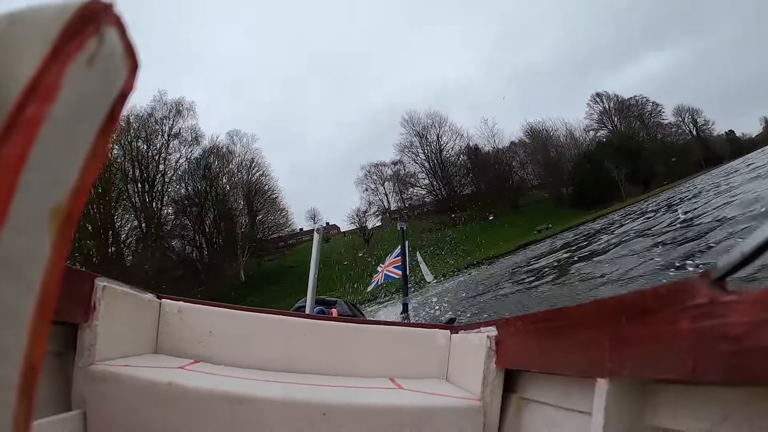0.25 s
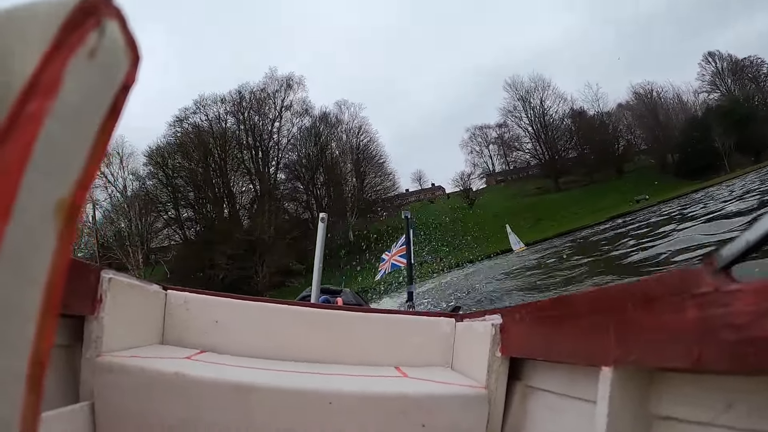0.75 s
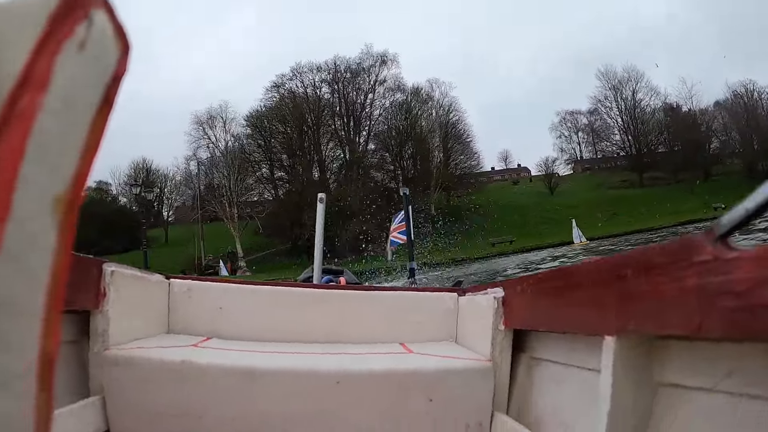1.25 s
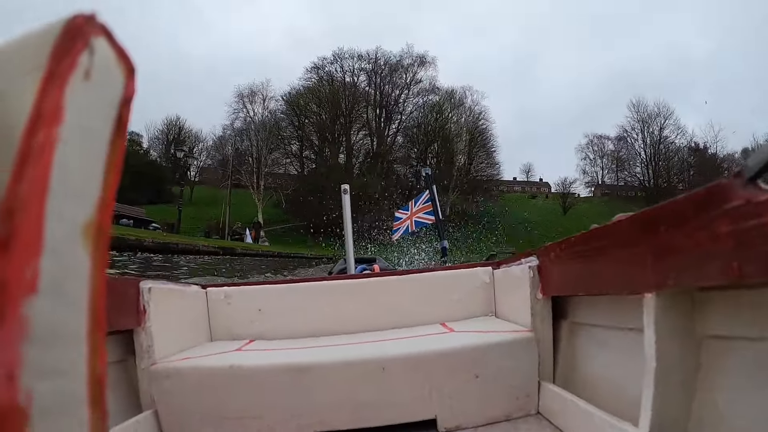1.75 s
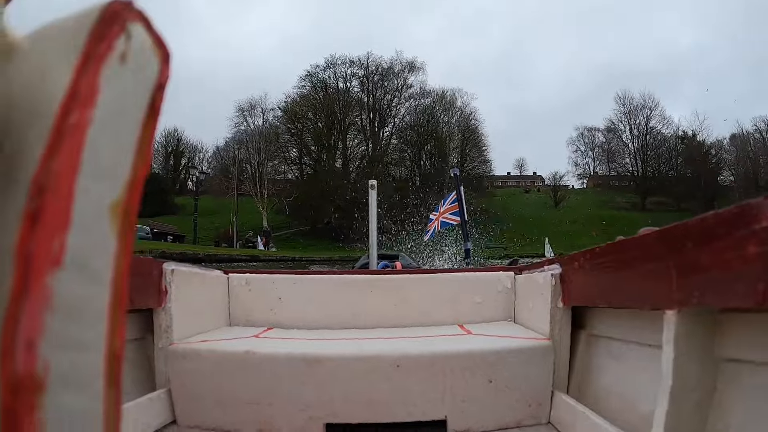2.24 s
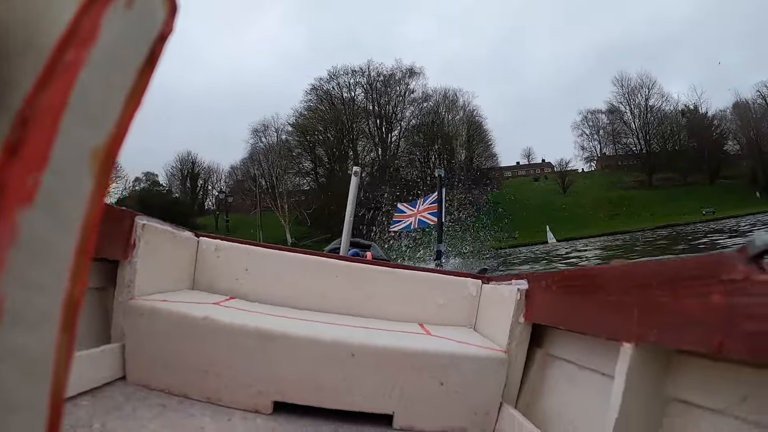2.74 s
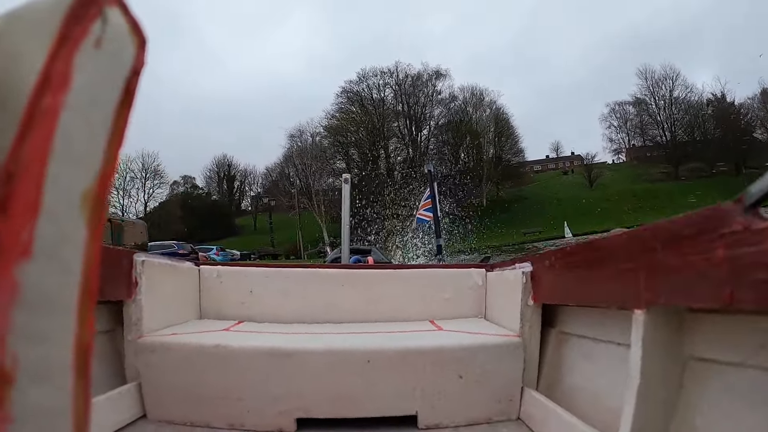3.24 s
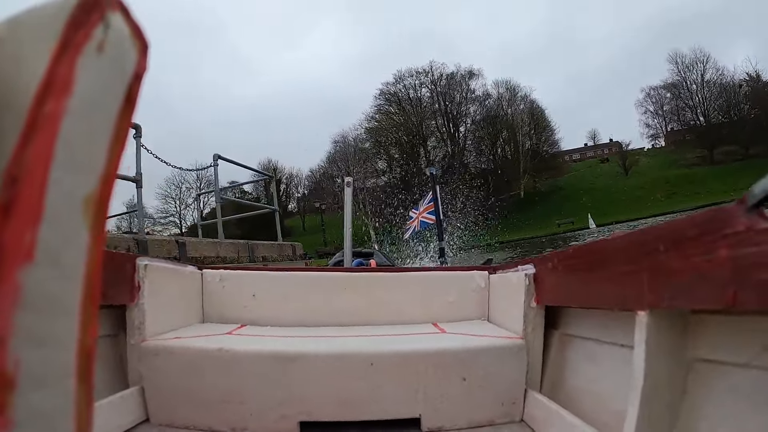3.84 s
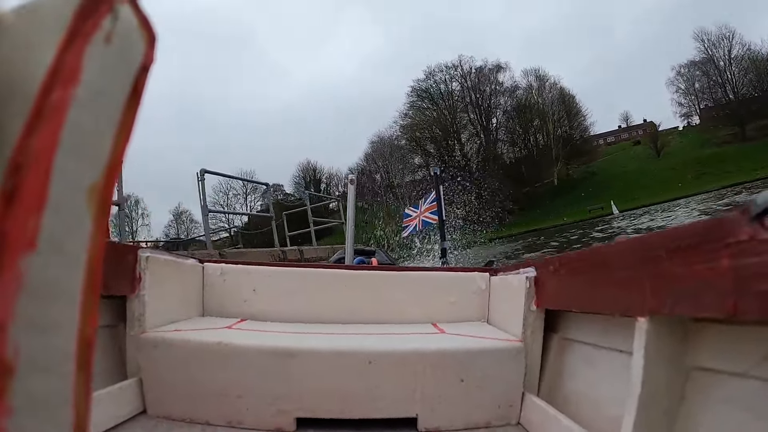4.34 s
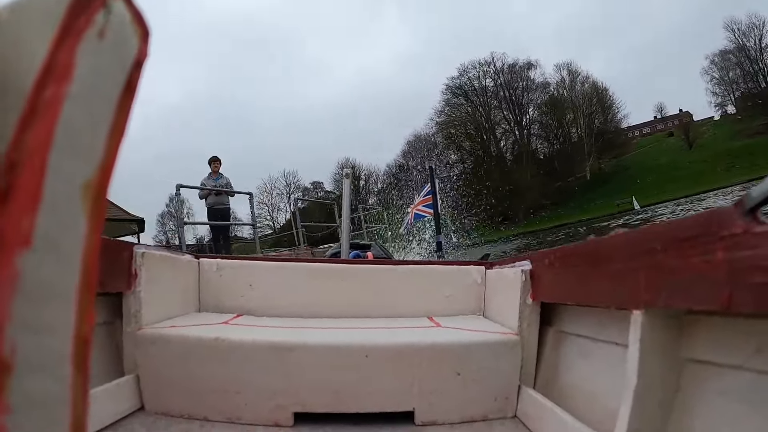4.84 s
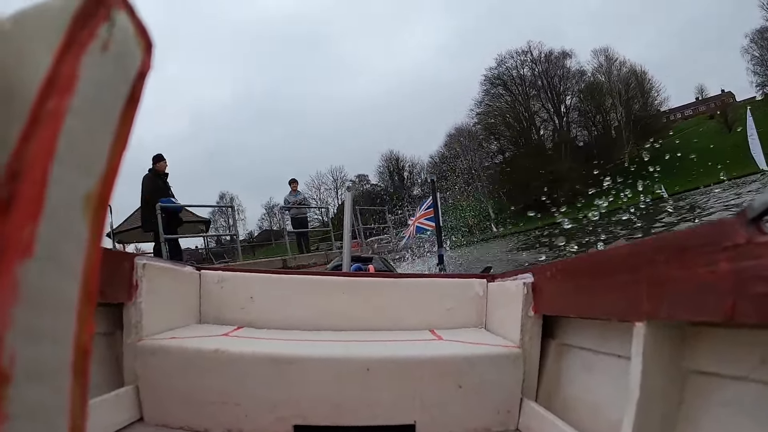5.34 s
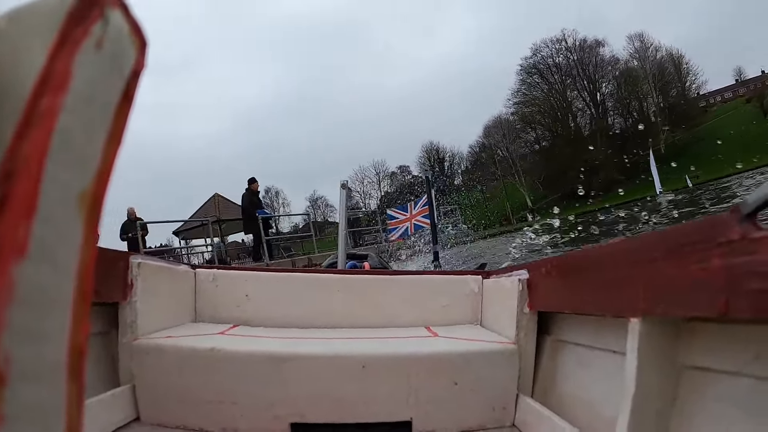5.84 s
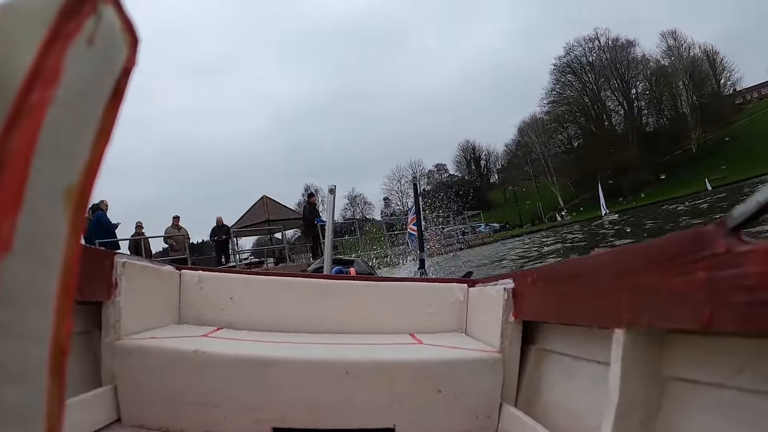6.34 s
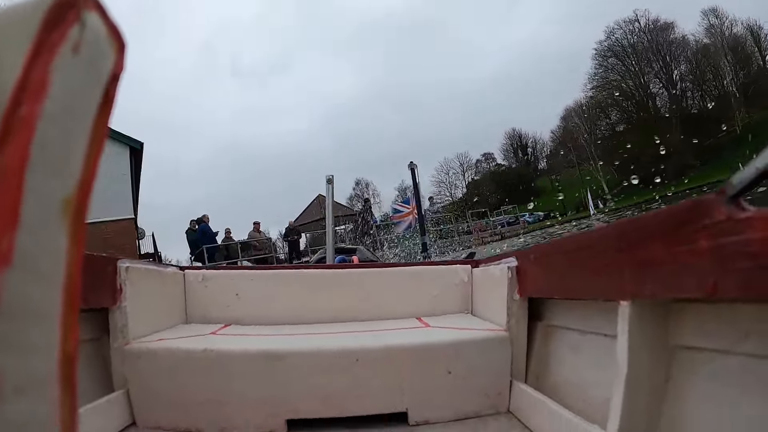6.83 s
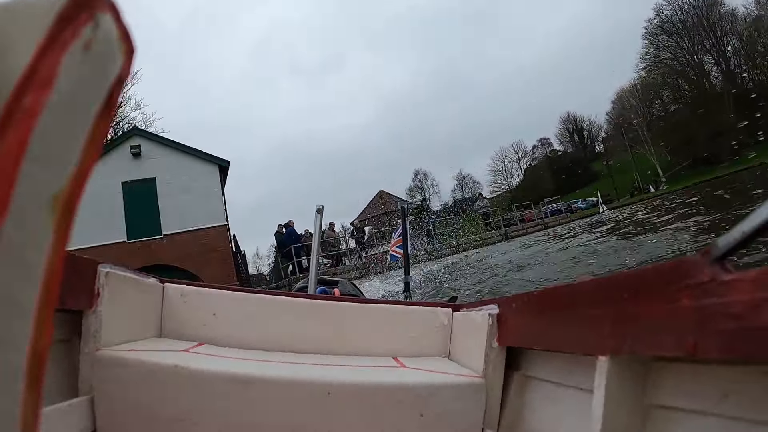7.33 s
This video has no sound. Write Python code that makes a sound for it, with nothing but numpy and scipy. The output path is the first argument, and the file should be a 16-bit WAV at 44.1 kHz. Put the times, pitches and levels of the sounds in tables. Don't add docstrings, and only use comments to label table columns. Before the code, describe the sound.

A buzzing motor drone holds nearly constant pitch while water rushes along thin planks and waves knock the hull, most heavily near the end.

```python
import sys
import numpy as np
from scipy import signal
from scipy.fft import rfft, irfft
from scipy.io import wavfile
from scipy.ndimage import uniform_filter1d

SR = 44100
rng = np.random.default_rng(int(sys.argv[2]) if len(sys.argv) > 2 else 0)


def bounce(signal):
    frames = np.transpose(np.atleast_2d(signal))
    limited = np.clip(frames, -1, 1)
    pcm = np.round(limited * 32767).astype(np.int16)
    wavfile.write(sys.argv[1], SR, pcm)


def ratio(d):
    e = np.asarray(d, float) / 20
    return 10 ** e


N = 334278

# (time [s], change [dB], spread [s])
FLOW_SURGES = [(0.289,-7,0.015), (0.409,-4.5,0.013), (0.609,-6.5,0.011), (0.9,2,.04), (1.262,-3.5,0.011),
               (1.58,1,0.011), (2.2,2.5,0.064), (2.38,1.5,0.01), (2.549,2.5,0.059), (2.689,1.5,0.047),
               (2.844,3.5,0.024), (3.0,1.5,.04), (3.4,2.5,.04), (3.49,-3,0.022), (3.647,3,0.01),
               (4.42,2,0.078), (4.615,-5,0.0051), (4.859,-3.5,0.029), (4.92,1.5,0.02), (5.293,-5.5,0.0084),
               (5.38,1.5,0.023), (5.512,-3.5,0.019), (5.617,-5.5,0.0063), (5.85,6,0.0053),
               (6.665,4.5,0.017), (6.74,-6.5,0.018), (6.815,-2.5,0.02), (6.914,-7.5,0.017),
               (6.969,-7.5,0.015), (7.35,2.5,0.033)]


def in_time(rows):
    s, *columns = np.transpose(rows)
    return [np.interp(np.arange(N) / SR, s, c) for c in columns]


def bumps(rows):
    out, t = np.zeros(N), np.arange(N) / SR
    for s, change, spread in rows:
        near = slice(max(int((s - 4 * spread) * SR), 0), int((s + 4 * spread) * SR))
        out[near] += change * np.exp(-0.5 * ((t[near] - s) / spread) ** 2)
    return out


def rms_one(x):
    return x / np.sqrt(np.mean(x ** 2) + 1e-20)


def drift(rate):
    r = np.exp(-40 * np.pi * rate / SR)
    coarse = rng.standard_normal(N // 20 + 4002)
    slow = signal.lfilter([1], [1, -2 * r, r * r], coarse)[4000:]
    return np.interp(np.arange(N) / 20, np.arange(len(slow)), rms_one(slow))


def band(x, low_hz, high_hz):
    return signal.sosfilt(signal.butter(3, [low_hz, high_hz], "band", fs=SR, output="sos"), x)


def ring(clicks, hz, cycles):
    r, w = ratio(-60 * hz / (cycles * SR)), 2 * np.pi * hz / SR
    return signal.lfilter([0, np.sin(w)], [1, -2 * r * np.cos(w), r * r], clicks + 1e-18)


def hull(x):
    # (frequency [Hz], level [dB per Hz])
    below_cavity = [(12, -42), (25, -17.5), (60, -19.5), (180, -19.5), (245, -10), (330, -14.5), (420, -10),
                    (560, -13), (650, -22), (770, -24), (1100, -18), (1320, -21.5), (1500, -16.5),
                    (2110, -20)]
    # (frequency [Hz], level [dB per Hz])
    above_cavity = [(2260, -0.5), (3100, 0), (3700, -4.5), (4800, -7.5), (5800, -13.5), (6400, -13.5),
                    (7800, -16), (8500, -21.5), (10400, -26), (11500, -35.5), (12400, -29.5), (14000, -38),
                    (15500, -46), (17000, -58.5)]
    # (frequency [Hz], width [Hz], boost [dB])
    planks = [(266.3, 53, 8), (400, 55, 6.5), (865, 61, 5), (1680, 81, 7.5), (1937, 150, 2.5),
              (4260, 100, -6), (4360, 166, 11)]
    housing_db = -33.5
    size = 16384
    hz = np.maximum(np.arange(size // 2 + 1) * SR / size, 1)
    points = np.array(below_cavity + [(f, db + housing_db) for f, db in above_cavity])
    level_db = np.interp(np.log(hz), np.log(points[:, 0]), points[:, 1])
    for f, width, boost_db in planks:
        level_db = level_db + boost_db / (1 + (2 * (hz - f) / width) ** 2)
    cepstrum = irfft(np.log(ratio(level_db)), size)
    cepstrum[1:size // 2] *= 2
    cepstrum[size // 2 + 1:] = 0
    return signal.fftconvolve(x, irfft(np.exp(rfft(cepstrum)), size))[..., :N]


def blade_db():
    # (time [s], level [dB])
    load = [(0.0, -20), (0.4, -17), (0.75, -12.5), (1.0, -18), (1.28, -10.5), (1.38, -26.0), (1.8, -34),
            (2.05, -19), (2.2, -28.5), (2.38, -16.5), (2.8, -11), (3.0, -18.5), (3.5, -14.5), (4.0, -19.5),
            (5.0, -14), (6.0, -15), (7.1, -17), (7.58, -13.5)]
    # (time [s], change [dB], spread [s])
    slips = [(0.344, -8, 0.02), (0.808, -15.5, 0.027), (0.863, -17.5, 0.018), (1.901, -6, 0.033),
             (2.145, -12, 0.016), (2.27, -8.5, 0.014), (2.514, -8.5, 0.01), (2.594, -11, 0.011),
             (2.699, -5.2, 0.018), (2.893, -14.5, 0.036), (3.352, -10.5, 0.04), (3.707, -3.5, 0.019),
             (4.495, -10, 0.049), (4.939, -13.5, 0.0099), (4.969, -6.7, 0.054), (5.024, -14, 0.012),
             (5.208, -7, 0.013), (5.373, -19, 0.034), (5.507, -4.5, 0.018), (5.607, -18, 0.014),
             (5.702, -8, 0.02), (5.822, -12.5, 0.025), (5.872, -7.5, 0.011), (6.081, -7.5, 0.036),
             (6.286, -6.5, 0.011), (6.44, -7, 0.016), (6.575, -6.5, 0.0097), (6.645, -6.5, 0.06),
             (7.094, -8, 0.03), (7.353, -6, 0.041)]
    # (time [s], change [dB], spread [s])
    bites = [(0.244,7,0.014), (0.56,2,0.04), (1.21,2,0.022), (1.626,13.5,0.04), (2.04,3.5,0.028),
             (2.47,1.5,0.016), (3.113,2.5,0.016), (3.198,6,0.012), (3.487,6.5,0.011), (3.881,7,0.015),
             (4.051,5.5,0.023), (4.255,5.5,0.013), (4.33,6,0.066), (4.56,5.5,0.022), (4.724,4,0.025),
             (4.8,3,0.025), (5.15,3.5,0.022), (5.245,8,0.0062), (5.57,4.5,.015), (5.76,3,.015),
             (5.961,4.5,0.043), (6.2,1.5,0.025), (6.505,2.5,0.034), (6.718,7,0.0065), (6.795,4,0.032),
             (6.95,4.5,.015), (7.2,0,0.016), (7.3,1.5,.015), (7.44,3,0.02)]
    return in_time(load)[0] + bumps(slips) + bumps(bites)


def spray_droplets(spray_db):
    sizes = ratio(4.5 * np.minimum(rng.exponential(1, N), 4.1))
    sizes = sizes * (rng.random(N) < 450 * ratio(spray_db) / SR)
    pitches, dealt = np.geomspace(2300, 13000, 16), rng.integers(0, 16, N)
    return sum(ring(sizes * (dealt == k), hz, cycles=95.0) * np.sqrt(hz) for k, hz in enumerate(pitches))


def water():
    # (time [s], lift [dB], spread [s])
    heaves = [(0.264,11,0.016), (0.389,10,0.018), (0.559,9,0.035), (0.908,10.5,0.024), (1.137,4,0.016),
              (2.12,1,0.023), (2.74,9,0.061), (3.15,5.5,0.026), (3.357,7.5,0.039), (3.62,3.5,0.044),
              (4.565,6.5,0.027), (5.852,7.5,0.02), (6.006,7,0.018), (6.371,3,0.067), (6.705,19,0.018),
              (6.944,15.5,0.022), (7.17,17.5,0.019), (7.473,12.5,0.055)]
    duck_per_db, duck_lag_s = 0.0143, 0.048
    beat_db, t = uniform_filter1d(blade_db(), size=1100), np.arange(N) / SR
    rush_db = bumps(FLOW_SURGES) - duck_per_db * np.interp(t - duck_lag_s, t, beat_db - beat_db.mean())
    spray_db = 1.04 * rush_db
    heave_db = bumps(heaves) - 2.2 + 1.6 * drift(5.4)
    gurgle_db = 0.46 * bumps(heaves) + 0.35 * rush_db - 2.5 + 0.8 * drift(8.8)
    lap_db = 0.47 * rush_db - 3.0 + 0.8 * drift(9.9)
    regions = [(140, heave_db), (280, gurgle_db), (600, lap_db), (2100, rush_db), (6000, spray_db),
               (np.inf, 0.7 * spray_db)]

    white, surge = rng.standard_normal((2, N)), drift(29)
    edges, flow = 16 * 2 ** np.arange(0, 10.1, 0.5), np.zeros(N)
    for k, (low, high) in enumerate(zip(edges, edges[1:])):
        flow_db = next(db for limit, db in regions if high < limit)
        half_octave = signal.butter(2, [low, high], "band", fs=SR, output="sos")
        patch = signal.sosfilt(half_octave, white[k % 2])
        flow += patch * ratio(flow_db + 1.02 * surge + 1.87 * drift(18.2))
    droplets = spray_droplets(spray_db)
    return ratio(-20) * rms_one(hull(rms_one(flow) + 0.27 * rms_one(droplets)))


def laps():
    per_s, level_db = 22, -35
    sizes = ratio(4.8 * np.minimum(rng.exponential(1, N), 3.1)) * (rng.random(N) < per_s / SR)
    pitches, dealt = np.geomspace(330, 720, 8), rng.integers(0, 8, N)
    knocks = sum(ring(sizes * (dealt == k), hz, cycles=14) for k, hz in enumerate(pitches))
    return ratio(level_db) * rms_one(band(knocks, 250, 900))


def drops():
    # (time [s], peak [dB], ring [Hz])
    landings = [(0.2515, -17.5, 2670), (0.6564, -19.5, 2370), (1.113, -18, 2440), (1.1962, -26, 2840),
                (1.7095, -25.5, 2380), (2.0832, -16, 3500), (2.37, -19, 3650), (2.6748, -23.5, 2920),
                (3.6426, -25, 2740), (4.0664, -22, 2420), (4.2243, -18.5, 2780), (4.5246, -20, 2910),
                (4.7055, -19.5, 2550), (5.263, -39, 2850), (5.668, -20.5, 3050), (5.847, -25, 2830),
                (6.1005, -23, 2816), (6.173, -19.5, 2440), (6.335, -19, 2630), (6.4363, -29, 2560),
                (6.6425, -14.5, 2680), (6.8643, -22, 2470), (6.9316, -21, 2500), (7.01, -22, 2620),
                (7.2418, -19, 2600), (7.4927, -17, 2450)]
    out, t = np.zeros(N + SR), np.arange(SR // 20) / SR
    for s, peak_db, hz in landings:
        burst = rng.standard_normal(len(t)) * np.exp(-t / 0.0064)
        ringing = ring(burst, hz, cycles=15.0)
        at = round(s * SR)
        out[at:at + len(t)] += ratio(peak_db - 3) * ringing / np.abs(ringing).max()
    return band(out[:N], 1500, 6000)


def slaps():
    # (time [s], peak [dB], knock [Hz], thud [dB], splash [dB])
    blows = [(0.103, -4.5, 520, -26, -23), (0.244, -0.5, 354, -49, -21), (0.382, -3.5, 517, -36, -31),
             (1.111, -11, 493, -52, -13.5), (2.829, -8, 407.4, -33, -29), (4.209, -5, 448.4, -43, -23),
             (4.813, -1.5, 487, -35, -19), (5.012, -8.5, 545.7, -33, -17), (5.263, -14, 490, -47, -16),
             (5.372, -10, 445.7, -30, -15), (5.46, -6, 527.3, -28, -12.5), (5.57, -7, 611, -38, -14),
             (5.606, -3, 438.5, -41, -25), (5.846, -9, 389, -45, -14.5), (6.431, -21, 399, -42, -15),
             (6.699, -11, 344.4, -33, -12), (6.712, -5.5, 505, -15, -37), (6.761, -2.5, 450, -43, -21),
             (6.829, -4, 423, -38, -34), (6.863, -18, 332.6, -45, -20), (6.888, -5.5, 583, -23, -19),
             (6.938, 1, 403, 0, -16), (7.231, -17, 554.4, -42, -31), (7.49, -10, 371.7, -17.5, -21)]
    out, splash, t = np.zeros(N + SR), np.zeros(N + SR), np.arange(SR // 8) / SR
    knock_shape = np.exp(-t / 0.0054) * (1 - np.exp(-t / 0.00054))
    for (s, peak_db, knock_hz, thud_db, splash_db), size in zip(blows, rng.random(len(blows))):
        tone = np.sin(2 * np.pi * knock_hz * t) + 0.12 * np.sin(2.9 * np.pi * knock_hz * t)
        knock = ratio(peak_db - 1.0) * tone * knock_shape
        thud = ratio(thud_db + 8.5) * np.sin(2 * np.pi * (100 + 25 * size) * t) * np.exp(-t / 0.0011)
        burst = ratio(splash_db + 30.5) * rng.standard_normal(len(t)) * np.exp(-t / 0.0033)
        at = round(s * SR)
        out[at:at + len(t)] += knock + thud
        splash[at:at + len(t)] += burst
    return out[:N] + hull(band(splash[:N], 450, 7500))


def order(turns, multiple, level_db, wobble_db, wander):
    height = np.sqrt(2) * ratio(level_db + wobble_db * drift(14))
    return height * np.sin(multiple * turns + wander * drift(17.8) + rng.uniform(0, 2 * np.pi))


def drive():
    # (time [s], turns per second [Hz], whirl [dB], motor current [dB])
    shaft = [(0.0, 138.2, 9.5, 2), (0.3, 139.4, 6.5, 2), (0.7, 138.2, 5, 0.5), (1.2, 138.1, 6, 0.5),
             (1.5, 137.6, 4, 2.5), (1.75, 137.5, -1, 4.5), (2.05, 139.2, 2, 3.5), (2.45, 138.4, -3, 4.5),
             (2.8, 139.7, -3, -2.5), (3.3, 138.8, 1, 2), (3.8, 140.6, -3, -0.5), (4.2, 138.1, -1, -0.5),
             (4.55, 137.8, 1, 0.5), (5.1, 138.3, 2.5, -5.5), (5.6, 139.2, -2.5, -3.5), (6.5, 138.5, 1.5, 1),
             (7.1, 139.8, -0.5, -2), (7.58, 139.4, -3, 1)]
    # (time [s], change [Hz], spread [s])
    sags = [
        (0.27, -6, 0.01507),
        (6.725, -9.5, 0.0201),
    ]
    # (multiple [1], level [dB], share of whirl [1], share of current [1], phase wander [rad])
    whirl_orders = [(3, -30, 0.8, .01, 0.11), (4, -33, .6, 0.99, 0.31), (5, -43.5, 0.15, 1.6, 0.53),
                    (6, -43.5, .2, 1.2, 0.38), (12, -33.5, .01, 1.6, 0.37)]
    # (multiple [1], rms level [dB])
    weak_orders = [(1, -46.5), (7, -47.5), (8, -41.5), (10, -49), (14, -41)]
    shaft_hz, whirl_db, current_db = in_time(shaft)
    turns = 2 * np.pi * np.cumsum(shaft_hz + bumps(sags)) / SR + 0.12 * drift(9.6)
    surge_db = bumps(FLOW_SURGES)
    beat_db = blade_db() + 0.22 * np.minimum(surge_db, 0)
    out = order(turns, 2, beat_db, wobble_db=1.0, wander=0.21)
    for k, db, whirl, current, wander in whirl_orders:
        level_db = db + whirl * whirl_db + current * current_db + 0.27 * surge_db
        level_db = level_db + 0.4 * drift(4.8)
        out = out + order(turns, round(k), level_db, wobble_db=1.6, wander=wander)
    for k, db in weak_orders:
        out = out + order(turns, k, db, wobble_db=3.5, wander=0.73)
    return out


def scene():
    return (water() + laps() + drops() + slaps() + drive())[None]


def roll_off(x):
    return signal.sosfilt(signal.butter(12, 15700, fs=SR, output="sos"), x)


def record(dry):
    mix = 1.067 * np.tanh(dry / 1.152)
    return roll_off(mix)


dry = scene()
out = record(dry)
bounce(out)
```